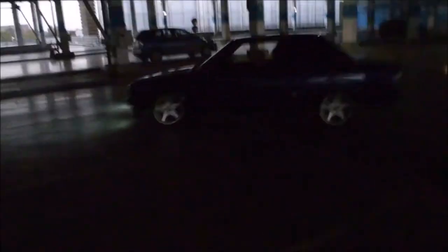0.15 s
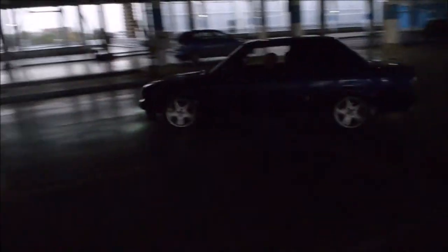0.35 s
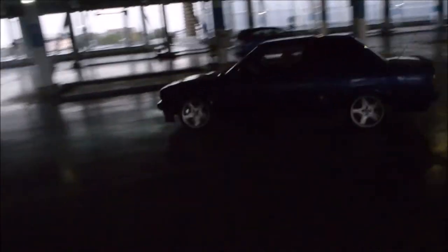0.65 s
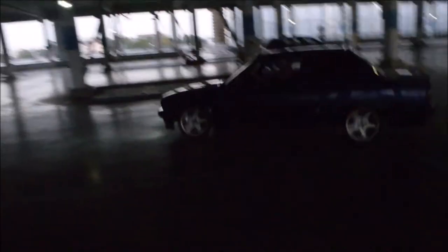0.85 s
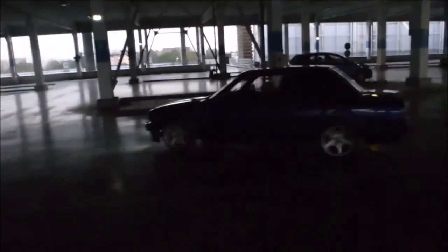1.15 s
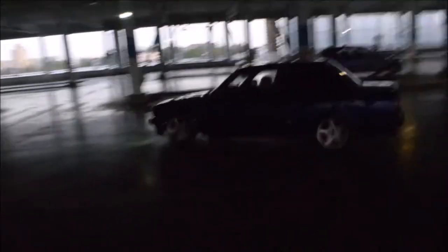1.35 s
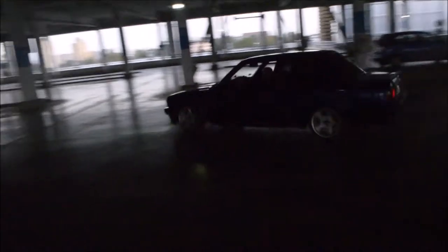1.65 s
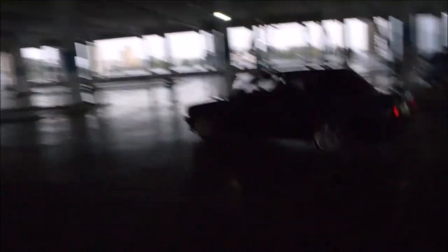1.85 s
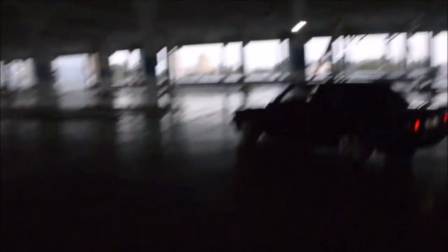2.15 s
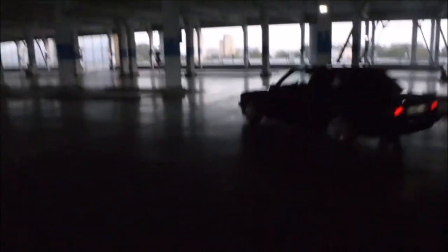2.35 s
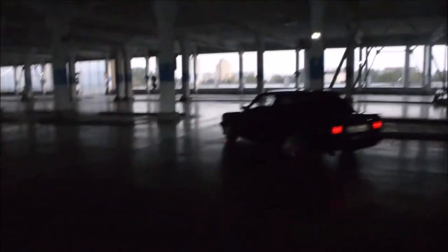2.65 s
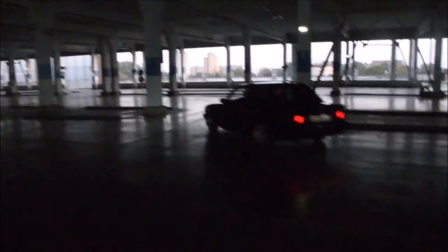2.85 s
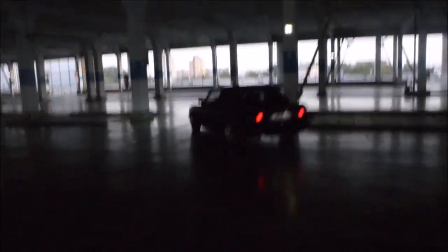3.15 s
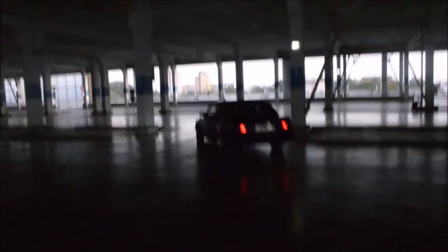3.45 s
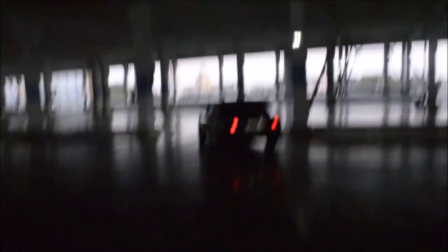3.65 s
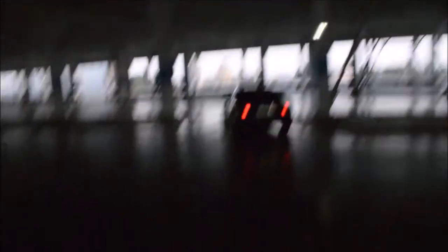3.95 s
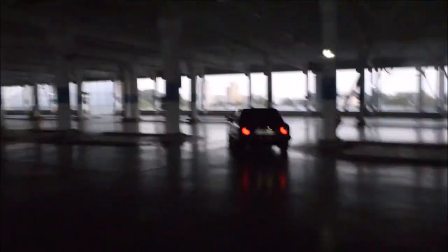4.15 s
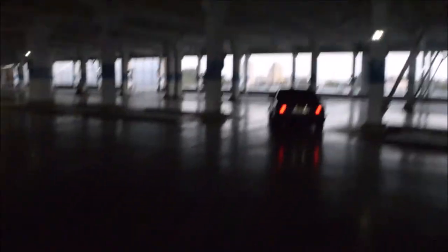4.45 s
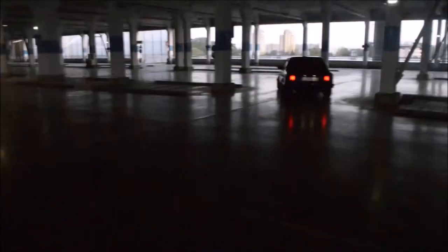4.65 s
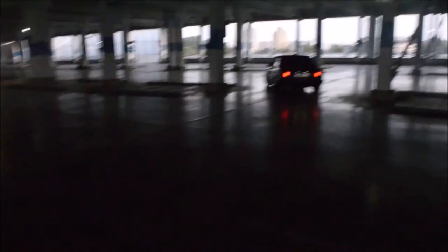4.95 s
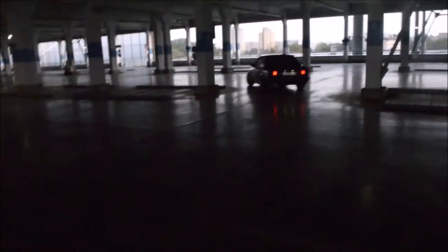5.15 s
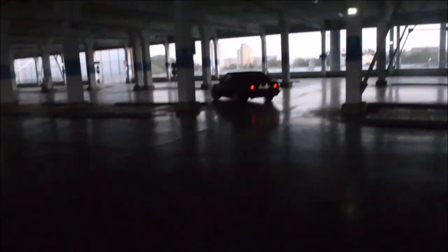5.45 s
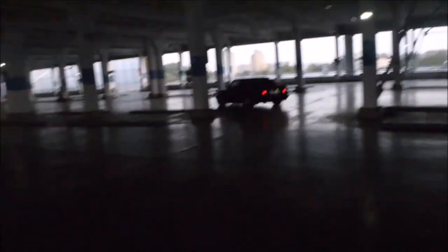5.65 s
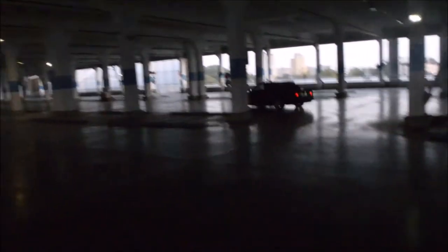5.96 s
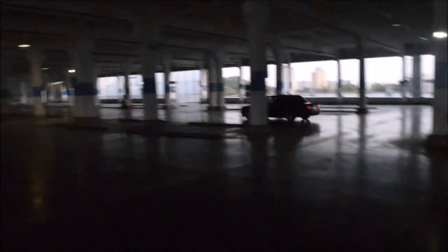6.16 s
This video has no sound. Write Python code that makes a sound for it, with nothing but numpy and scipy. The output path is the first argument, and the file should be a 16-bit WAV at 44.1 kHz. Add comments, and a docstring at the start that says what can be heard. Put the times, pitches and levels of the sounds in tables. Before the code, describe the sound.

Low engine drone and faint tyre squeal in a concrete garage, until the car is floored and climbs to a rasping roar.

```python
"""Parking garage getaway

A four-cylinder car circles at low revs on damp concrete, then is floored and slides away. Its exhaust
drones on multiples of the crank speed, swelling and dipping through the hall's standing waves, then
climbs to a rasping firing note over a low boom. The engine bay clatters; the tyres rumble, hiss, crack
grit and scrub. Sharp clicks snap close by, one leaving metal ringing, and a faint whine sits on top."""
import sys
import numpy as np
from scipy import signal
from scipy.fft import rfft, irfft, next_fast_len
from scipy.io import wavfile
from scipy.ndimage import uniform_filter1d, map_coordinates

SR = 44100
rng = np.random.default_rng(int(sys.argv[2]) if len(sys.argv) > 2 else 0)


def inscribe(sig):
    """Save sig as 16-bit PCM at rate SR to the path in sys.argv[1].

    A 1-D sig is mono; a 2-D sig holds one channel per row.
    Samples are clipped to [-1, 1] before scaling.
    """
    pcm = np.round(np.clip(np.atleast_2d(sig).T, -1, 1) * 32767)
    wavfile.write(sys.argv[1], SR, pcm.astype(np.int16))


N = 277826

# crankshaft speed: (time [s], speed [turns/s])
CRANK_SPEED = [(0, 21.9), (.57, 17.7), (.92, 18.7), (1.59, 20.7), (2.1, 21.5), (3.47, 21.55), (3.8, 21.8),
               (4.15, 22.5), (4.44, 24.1), (4.6, 24.6), (4.7, 26.3), (4.82, 27.7), (5, 35), (5.1, 47),
               (5.38, 73.5), (5.47, 84), (5.53, 96), (5.68, 111.5), (5.93, 115), (6.04, 101), (6.3, 99)]
# a blip while circling, then a push and the pedal floored: (time [s], throttle [0-1])
THROTTLE = [(0, .2), (.65, .02), (1.05, .22), (1.5, .14), (2.2, .06), (4.1, .02), (4.55, .1), (4.75, .36),
            (4.95, .6), (5.22, .52), (5.43, .54), (5.49, .94), (5.68, .88), (5.85, .76), (6.3, .7)]
# reverb of the concrete hall: (frequency [Hz], t60 [s])
HALL_DECAY = [(100, 2.8), (400, 1.45), (2000, 1.7), (10000, 0.7)]
# one strong standing wave: (frequency [Hz], t60 [s], gain at resonance [dB])
HALL_MODE = (225, 4.7, -2.4)
# the car passes nodes of the standing waves: (time [s], order [cycles/turn], half width [s])
HALL_NODES = [(0.15, 6, 0.03), (0.55, 6, 0.07), (1.27, 5, 0.25), (1.4, 6, 0.31), (1.5, 7, 1.58),
              (2.03, 8, 0.19), (2.6, 10, 0.07), (2.68, 8, 0.07), (2.78, 5, 0.1), (2.95, 6, 0.15),
              (3.06, 8, 0.14), (3.35, 10, 0.13), (3.62, 5, 0.22), (4, 6, 0.38), (4.15, 5, 0.04),
              (4.24, 4, 0.1), (4.4, 6, 0.25), (4.85, 5, 0.28), (5.03, 2, .025), (5.32, 2, .015),
              (5.43, 2, .04), (5.43, 4, .07), (5.63, 2, .02), (5.98, 2, .02), (6.15, 2, .02)]
# fader of the slow engine's drone: (time [s], level [dB])
DRONE_LEVEL = [(0, -27), (.45, -39), (.7, -29.5), (1, -24.5), (1.3, -24), (1.9, -22), (2.3, -26),
               (2.7, -27), (3.3, -27), (3.75, -27.5), (4.02, -18.5), (4.35, -23), (4.5, -19), (4.7, -12),
               (4.95, -19.5)]
# partials of the drone: (order [cycles/turn], level [dB])
DRONE_ORDERS = [(3, -22), (4, -6), (5, -4.5), (6, 0), (7, 7.5), (8, 2), (9, -15), (10, -8.5), (11, -20),
                (12, -14), (13, -16.5), (14, -13)]
# resonances of silencer and hall that the partials glide through: (frequency [Hz], gain [dB])
DRONE_EQ = [(60, -19), (75, -.5), (88, -5), (98, 10), (112, 4.5), (127, 8), (140, -4.5), (152, -17),
            (166, -5.5), (178, -7.5), (190, -14), (205, -11), (213, -1), (232, -2), (258, -13), (266, 1),
            (282, -1), (300, -7), (400, -11)]
# drone partials with an extra fader: (order [cycles/turn])
UPPER_ORDERS = (7, 8, 10, 12)
# that fader, highest as the tailpipe swings past: (time [s], gain [dB])
UPPER_GAIN = [(0, -4), (.95, 5), (1.7, 4.5), (2.35, 10), (3.4, 11), (3.8, 0), (4.1, -9), (4.45, -9),
              (4.75, -14), (4.95, -11)]
# partials of the hard-driven engine: (order [cycles/turn], level [dB], roughness [0-1])
FIRING_ORDERS = [(2, 0, .2), (2.5, -18, .8), (3, -10.5, .35), (4, -5.5, .3), (5, -17, .8)]
# the silencer's pass band and notches: (frequency [Hz], gain [dB])
SILENCER_EQ = [(45, -50), (54, -31), (64, -18.5), (73, -21), (92, -13.5), (112, -9), (146, -7), (153, -18),
               (166, -22), (196, -13.5), (212, -17), (228, -19.5), (260, -14), (305, -24), (345, -24),
               (400, -22), (430, -32), (460, -37), (600, -36)]
# colour the exhaust pipe gives the rasp: (frequency [Hz], gain [dB])
PIPE_EQ = [(60, -38), (170, -8), (255, 0), (300, -3.5), (345, -2), (400, -5), (450, -11.5), (520, -10),
           (670, -11.5), (900, -15), (1300, -24), (2500, -32.5), (4000, -45), (10000, -90)]
# low boom hanging in the hall: (time [s], level [dB])
BOOM_LEVEL = [(0, -22.5), (1.3, -30.5), (1.8, -35), (3.6, -39.5), (4.45, -35.5), (4.7, -22.5), (4.97, -16),
              (5.33, -22.5), (5.43, -25), (5.51, -18), (6.3, -18.5)]
# the hall's bass resonances: (frequency [Hz], gain [dB])
BOOM_EQ = [(20, -43), (45, -31.5), (70, -16), (100, 3), (125, 8), (175, 3), (220, 3), (300, -16.5),
           (600, -55), (2000, -120)]
# fader of the engine bay: (time [s], level [dB])
BAY_LEVEL = [(0, -34.5), (1.4, -33), (4, -36), (4.95, -34.5), (5.3, -47), (5.45, -34), (6, -28.5),
             (6.3, -30)]
# colour of fan, belts and valves: (frequency [Hz], gain [dB])
BAY_EQ = [(200, -35), (450, -7), (640, -6.5), (800, -3), (1000, 0), (1200, -3), (1600, -7), (2000, -9.5),
          (2300, -13.5), (2800, -17), (3300, -22.5), (4000, -31.5), (5000, -42.5), (15000, -100)]
# wheel rumble: (time [s], level [dB])
RUMBLE_LEVEL = [(0, -47), (1.2, -43.5), (2.4, -47), (4.3, -46.5), (5.2, -42), (5.8, -49.5), (6.05, -50),
                (6.22, -34)]
# colour of tyres rolling on concrete: (frequency [Hz], gain [dB])
RUMBLE_EQ = [(15, -14), (35, -6.5), (70, 8), (140, -23), (800, -120)]
# colour of fine spray: (frequency [Hz], gain [dB])
SPRAY_EQ = [(2000, -14), (4000, 2.5), (5000, -0.5), (6500, -5), (8000, -7.5), (11000, -11.5),
            (13000, -16.5), (15800, -19.5)]
# the tyres cross wetter patches: (time [s], half length [s], boost [dB])
WET_PATCHES = [(.76, .08, 4), (2.13, .08, 2), (4.05, .04, 4), (4.6, .16, 5), (4.96, .06, 8), (5.14, .05, 5)]
# faint, thin whine: (time [s], level [dB])
WHINE_LEVEL = [(0, -91), (2.1, -93), (2.5, -84), (3.7, -84), (4.55, -81), (5, -92), (6.3, -93)]
# close clicks: (time [s], peak [dB], t60 [s], pitch [ratio], low cut [Hz], treble shelf [dB])
CLICKS = [(0.1611, -17, 0.008, 0.92, 1200, 6), (0.1661, -8, 0.022, 0.97, 300, 3),
          (0.175, -13, 0.0055, 0.85, 400, 0), (.178, -1, 0.013, 1.04, 900, 4),
          (0.1811, -16, 0.05, 1, 300, -2), (0.935, -6.5, 0.008, 1.25, 1800, -4),
          (1.0809, -15, 0.005, 1, 700, 5), (5.179, -23, 0.013, 0.9, 500, 0)]
# the small body that clicks: (frequency [Hz], gain [dB])
CLICK_BODY_EQ = [(200, 2.5), (540, 6.5), (850, 0), (1200, 9), (1700, 2), (2300, 5), (3100, 0), (3550, -11),
                 (3900, -11), (4800, -17), (5700, -29), (6700, -25.5), (10000, -41), (15000, -51)]
# modes of a small metal part: (frequency [Hz], level [dB], t60 [s])
RING_MODES = [(3420, -35, 0.27), (6700, -60, 0.35)]
# rubber squeals: (time [s], pitch [Hz], half width [Hz], half length [s], level [dB])
SQUEALS = [(2.12, 5500, 700, 0.017, -58), (3.05, 990, 90, .65, -39.5), (2.85, 1990, 60, 0.4, -48),
           (4.87, 4400, 300, 0.035, -51.5)]
# grains cracking under the tyres: (time [s], peak [dB])
GRIT_CRACKS = [(2.3053, -43), (4.5737, -45), (4.6774, -42), (4.9693, -38), (5.2062, -41), (5.531, -41)]
# colour of sliding rubber: (frequency [Hz], gain [dB])
SCRUB_EQ = [(2000, -27), (3500, -12.5), (5000, -1), (6200, -2.5), (7500, -13), (10000, -22.5), (15000, -36)]


def amp(db):
    """Decibels to gain."""
    return 10 ** (np.asarray(db) / 20)


def unit(x):
    """Scale to rms 1."""
    return x / np.sqrt(np.mean(x ** 2) + 1e-20)


def along(points, hz):
    """Read (frequency, value) points at hz, on a log axis."""
    f, v = np.transpose(points)
    return np.interp(np.log(hz + 1), np.log(f + 1), v)


def automation(points):
    """Join (time, value) points into one value per sample."""
    return np.interp(np.arange(N) / SR, *np.transpose(points))


def swell(at_s, half_length_s):
    """A bell-shaped envelope peaking at 1."""
    return np.exp(-((np.arange(N) / SR - at_s) / half_length_s) ** 2)


def wobble(rate):
    """A smooth random curve, rate knots a second."""
    return map_coordinates(rng.standard_normal(int(N * rate / SR) + 4), [np.arange(N) * rate / SR])


def filtered(x, response):
    """Filter x by a gain that is a function of frequency."""
    size = next_fast_len(N + SR // 2)
    return irfft(rfft(x, size) * response(np.fft.rfftfreq(size, 1 / SR)), size)[:N]


def coloured(x, eq):
    """x through an EQ curve, at rms 1."""
    return unit(filtered(x, lambda hz: amp(along(eq, hz))))


def patchy_noise(depth_db):
    """White noise with patches of gain drifting in time and frequency."""
    spectra = signal.stft(rng.standard_normal(N), nperseg=1024)[2]
    patches = uniform_filter1d(rng.standard_normal(spectra.shape), size=5, axis=0)
    patches = unit(uniform_filter1d(patches, size=10, axis=1))
    return unit(signal.istft(spectra * amp(depth_db * patches), nperseg=1024)[1][:N])


def hall(x, wet_db):
    """Blend in the long reverb of concrete floor and ceiling, at about the same power."""
    hz, t, spectra = signal.stft(rng.standard_normal(2 * SR), SR, nperseg=256)
    decay = amp(-60 * t / along(HALL_DECAY, hz)[:, None])
    tail = signal.istft(spectra * decay, SR, nperseg=256)[1]
    wet = signal.fftconvolve(x, tail / np.linalg.norm(tail))[:N]
    return (x + amp(wet_db) * wet) / np.hypot(1, amp(wet_db))


def partial(order, angle, scatter, rate, phase=0, node_floor=.15):
    """One crank order, fluttering at random; it dips and flips phase at each of its nodes in the hall."""
    t = np.arange(N) / SR
    gain = (1 + scatter * (wobble(rate) + 1j * wobble(rate))) / np.hypot(1, scatter)
    for at_s, node_order, width_s in HALL_NODES:
        if node_order == order:
            past = (t - at_s) / width_s
            gain *= (past + 1j * node_floor) / np.hypot(past, 1)
    return np.real(gain * np.exp(1j * (order * angle + phase)))


def drone(angle, speed):
    """Clean partials of the slow engine; wandering echoes roughen them, and they fade as revs climb."""
    fade = np.clip((41 - speed) / 11, 0, 1)
    echo_share = np.interp(speed, [24, 30], [.1, .35])
    level_db, upper_db = automation(DRONE_LEVEL), automation(UPPER_GAIN)
    voice = np.zeros(N)
    for order, db in DRONE_ORDERS:
        gain = amp(db + level_db + along(DRONE_EQ, order * speed) + upper_db * (order in UPPER_ORDERS))
        voice += gain * partial(order, angle, echo_share, rate=12, phase=rng.uniform(0, 2 * np.pi))
    burble = amp(1.2 * wobble(21))  # no two engine cycles burn alike
    return np.sqrt(2) * fade * burble * voice


def firing_note(angle, speed):
    """Two firings a turn; under load the cylinders fire unequally and add sputtering partials above."""
    load = np.clip((speed - 29) / 8, 0, 1)
    far = np.clip((speed - 76) / 15, 0, 1)  # far off at full revs: rougher and wetter
    silencer = lambda order: np.sqrt(2) * amp(along(SILENCER_EQ, order * speed))
    voice = np.zeros(N)
    for order, db, roughness in FIRING_ORDERS:
        tone = partial(order, angle, roughness * (1 + far / 2), rate=42)
        voice += amp(db) * silencer(order) * (1 if order == 2 else load) * tone
    # the note sweeps into a standing wave, which rings on after the revs drop
    hz, t60, db = HALL_MODE
    b, a = signal.iirpeak(hz, Q=np.pi * hz * t60 / np.log(1000), fs=SR)
    standing_wave = amp(db) * signal.lfilter(b, a, silencer(2) * np.cos(2 * angle))
    return hall((1 - far) * voice, wet_db=-13) + hall(far * voice, wet_db=-5) + standing_wave


def exhaust_rasp(angle, speed, throttle, shut_db=-36.5, open_boost_db=17):
    """One puff per firing, sized by its cylinder, with turbulence, through the pipe into the hall."""
    firings = np.flatnonzero(np.diff(np.floor(angle / np.pi)))
    cylinder_db = np.resize([9.5, -9, 2, -.5], len(firings))
    puffs = np.zeros(N)
    puffs[firings] = amp(cylinder_db + 3 * rng.standard_normal(len(firings))) / np.sqrt(speed[firings])
    gas = patchy_noise(depth_db=-4) * (1 + .33 * np.cos(2 * angle))
    load = np.clip(speed / 80, .25, 1)  # the puffs stand out of the gas noise under load
    pipe = coloured(load * unit(puffs) + .89 * unit(gas), PIPE_EQ)
    return hall(amp(shut_db + open_boost_db * throttle) * pipe, wet_db=4.5)


def hall_boom():
    """A bed of bass noise: the hall's overlapping low resonances."""
    return amp(automation(BOOM_LEVEL)) * coloured(rng.standard_normal(N), BOOM_EQ)


def engine_bay(angle, trim_db=1):
    """Fan and valve noise, pulsing lightly with the crank."""
    pulse = 1 + .032 * np.cos(2 * angle) + .027 * np.cos(angle)
    level_db = automation(BAY_LEVEL) + trim_db + .54 * wobble(14)
    return amp(level_db) * coloured(pulse * patchy_noise(depth_db=1), BAY_EQ)


def wheel_rumble():
    """Deep, uneven rumble of the wheels on the slab."""
    level_db = automation(RUMBLE_LEVEL) + 1.2 * wobble(3.6)
    return amp(level_db) * coloured(rng.standard_normal(N), RUMBLE_EQ)


def tyre_spray(throttle, fall_db_per_s=1, wheelspin_db=10):
    """Fine spray hisses off the tread, fading as the car leaves, growing with wheelspin and wet floor."""
    level_db = -62 - fall_db_per_s * np.arange(N) / SR + wheelspin_db * throttle
    level_db += sum(db * swell(at_s, half_s) for at_s, half_s, db in WET_PATCHES)
    flicker_db = 1.5 * wobble(24)
    return amp(level_db + flicker_db) * coloured(patchy_noise(depth_db=1.2), SPRAY_EQ)


def whine(hz=15670):
    """One faint tone of steady pitch at the very top of the treble."""
    return np.sqrt(2) * amp(automation(WHINE_LEVEL)) * np.sin(2 * np.pi * hz * np.arange(N) / SR)


def clicks(shelf_hz=5000):
    """Each click is a sharp snap and a short rattle in a small, well damped body."""
    size = 4096
    t = np.arange(size) / SR
    hz = np.fft.rfftfreq(size, 1 / SR) + 1
    causal = np.r_[1, np.full(size // 2 - 1, 2), np.zeros(size // 2)]
    out = np.zeros(N + size)
    for at_s, db, t60, pitch, low_cut_hz, treble_db in CLICKS:
        shelf_db = treble_db / (1 + (shelf_hz / hz) ** 2)
        eq = amp(along(CLICK_BODY_EQ, hz / pitch) + shelf_db) / np.hypot(1, (low_cut_hz / hz) ** 2)
        body = np.exp(rfft(irfft(np.log(eq)) * causal))  # minimum phase keeps the attack crisp
        snap = (t == 0) + .23 * rng.standard_normal(size) * amp(-60 * t / t60)
        click = irfft(rfft(snap) * body)
        out[round(at_s * SR):][:size] -= amp(db) * click / np.abs(click).max()
    return out[:N]


def metal_ring():
    """The loudest click leaves a small metal part ringing."""
    struck_s = max(CLICKS, key=lambda row: row[1])[0]
    t = np.maximum(np.arange(N) / SR - struck_s, 0)
    return sum(amp(db - 60 * t / t60) * np.sin(2 * np.pi * hz * t) for hz, db, t60 in RING_MODES)


def tyre_squeals():
    """Rubber chirps and squeals faintly on the smooth floor: swells of narrow-band noise."""
    out = np.zeros(N)
    for at_s, hz, width_hz, half_s, db in SQUEALS:
        band = filtered(rng.standard_normal(N), lambda f: np.exp(-((f - hz) / width_hz) ** 2))
        out += amp(db) * swell(at_s, half_s) * unit(band)
    return out


def grit_cracks(low_cut_hz=7500, t60=.003):
    """Single grains crack under the tread, each a tiny, bright burst."""
    t = np.arange(SR // 50) / SR
    low_cut = signal.butter(2, low_cut_hz, "high", fs=SR, output="sos")
    out = np.zeros(N)
    for at_s, db in GRIT_CRACKS:
        crack = signal.sosfilt(low_cut, rng.standard_normal(len(t)) * amp(-60 * t / t60))
        out[round(at_s * SR):][:len(t)] += amp(db) * crack / np.abs(crack).max()
    return out


def flung_grit(grains_per_s=45):
    """A sprinkle of ticks: grit flung up as the rear wheels break loose."""
    grains = rng.standard_normal(N) * (rng.random(N) < grains_per_s / SR)
    ticks = coloured(grains, [(2000, -19.5), (5000, 2), (15000, -8)])
    return amp(-67) * swell(at_s=5.1, half_length_s=.45) * ticks


def tyre_scrub(peak_s=5.88, rise_db_per_s=48.5, fall_db_per_s=21):
    """Sliding rubber hisses as the rear tyres break loose, then dies away as they grip again."""
    past_s = np.arange(N) / SR - peak_s
    level_db = -53 - np.maximum(-rise_db_per_s * past_s, fall_db_per_s * past_s)
    return amp(level_db + .96 * wobble(16)) * coloured(patchy_noise(depth_db=1.5), SCRUB_EQ)


def scene():
    """The mono mix; one crankshaft keeps drone, firing note, rasp and engine bay in step."""
    speed, throttle = automation(CRANK_SPEED), automation(THROTTLE)
    angle = 2 * np.pi * np.cumsum(speed * (1 + .002 * wobble(18))) / SR
    exhaust = drone(angle, speed) + firing_note(angle, speed) + exhaust_rasp(angle, speed, throttle)
    beds = engine_bay(angle) + hall_boom() + wheel_rumble() + whine()
    tyres = tyre_spray(throttle) + tyre_squeals() + grit_cracks() + flung_grit() + tyre_scrub()
    return (exhaust + beds + tyres + clicks() + metal_ring())[None]


def record(dry, ceiling=.98, fade_s=.006, high_cut_hz=15800):
    """Master chain: soft-clip the highest peaks, fade the very end, and cut the top steeply."""
    clipped = dry / (1 + np.abs(dry / ceiling) ** 8) ** (1 / 8)
    fade_out = np.minimum(np.arange(N)[::-1] / (fade_s * SR), 1)
    high_cut = signal.ellip(10, .1, 90, high_cut_hz, fs=SR, output="sos")
    return signal.sosfilt(high_cut, clipped * fade_out)


dry = scene()
out = record(dry)
inscribe(out)
```